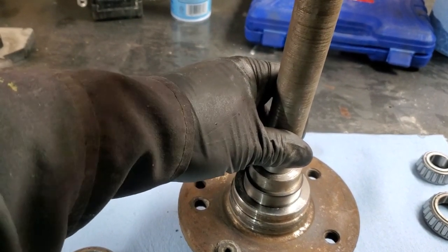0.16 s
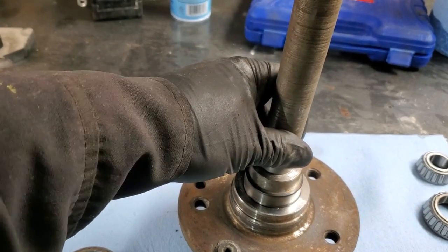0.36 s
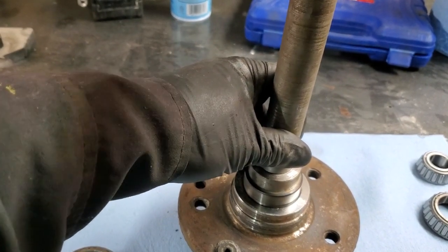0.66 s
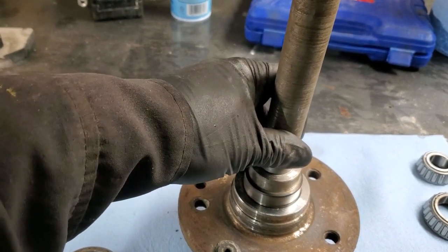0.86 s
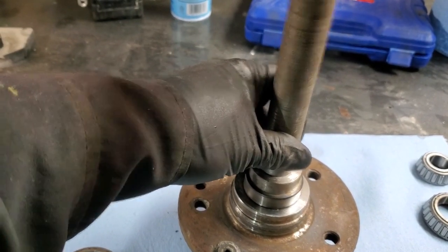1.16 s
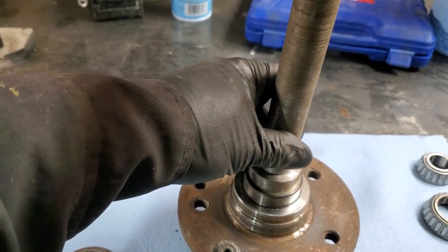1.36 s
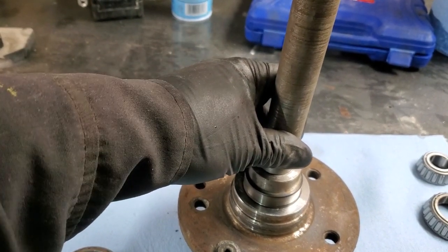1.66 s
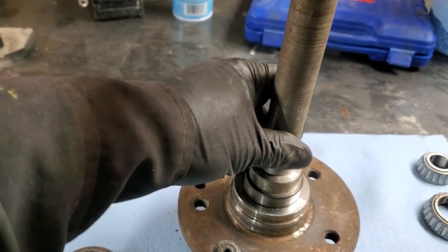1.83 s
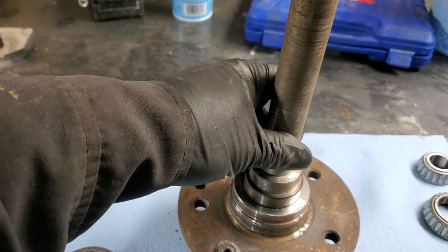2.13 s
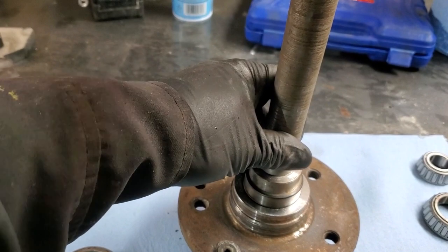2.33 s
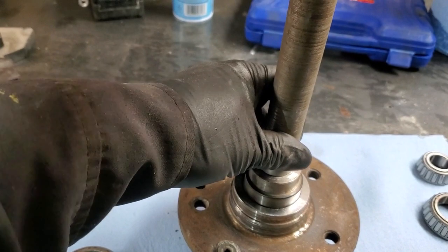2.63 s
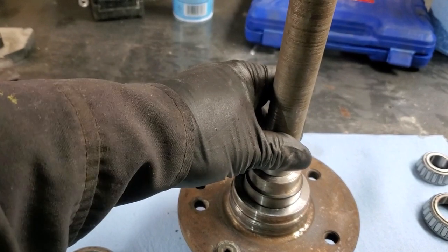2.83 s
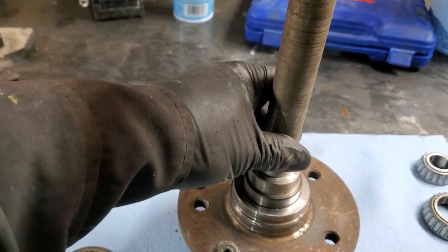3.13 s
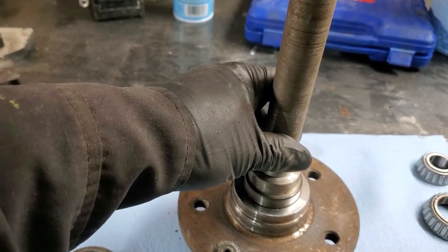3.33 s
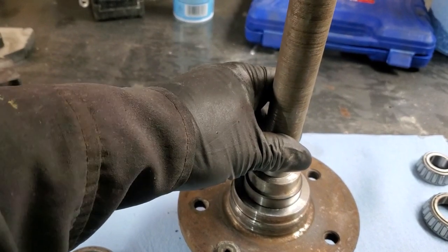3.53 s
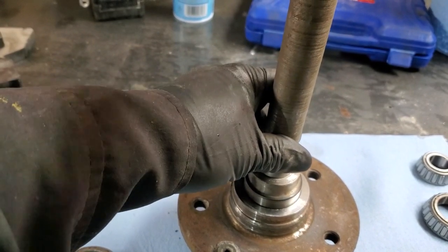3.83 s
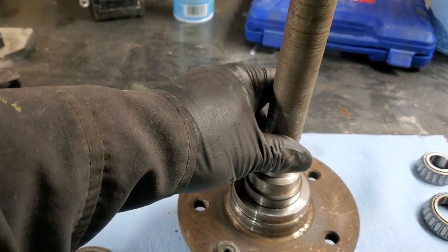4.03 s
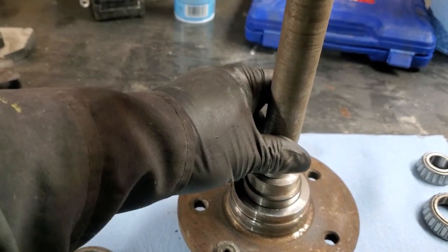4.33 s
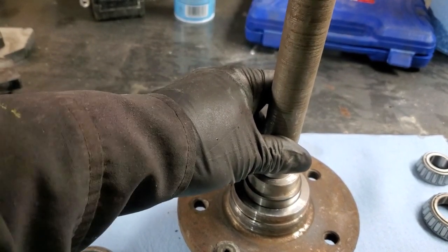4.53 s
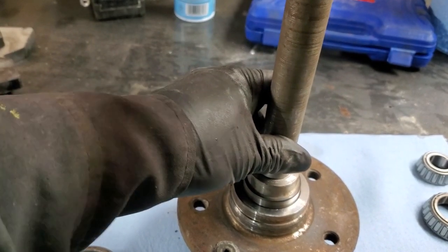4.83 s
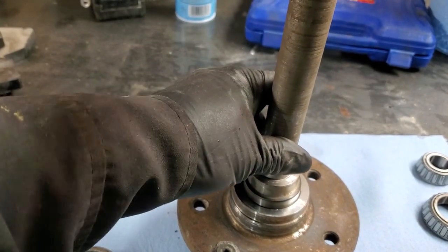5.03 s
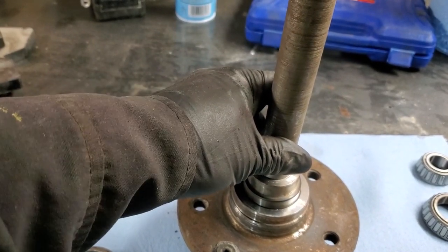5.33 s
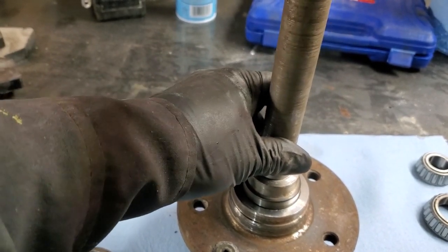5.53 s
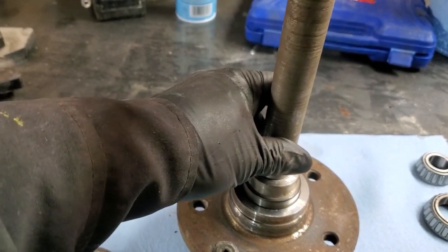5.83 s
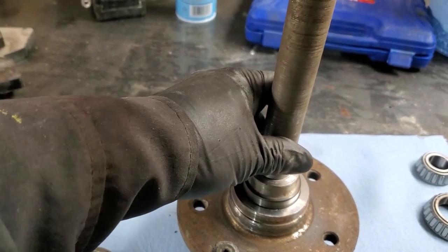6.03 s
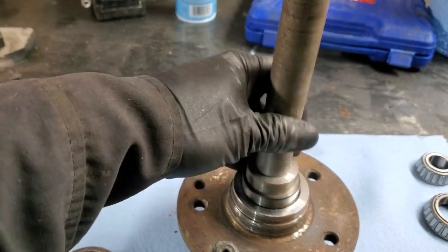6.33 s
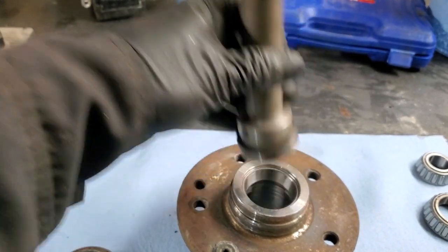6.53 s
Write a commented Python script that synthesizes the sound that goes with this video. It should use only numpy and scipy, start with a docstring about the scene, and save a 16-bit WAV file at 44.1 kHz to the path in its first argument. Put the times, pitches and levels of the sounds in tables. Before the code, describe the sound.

Loud, close hammering on steel over quiet room air and a low hum. Ten regular blows crack, thud through bench and hub, and clang for about half a second in a small room. Midway a loose part rumbles on the bench, chatters and scrapes between blows. The final strike sounds firmer and less boomy; the background drops and the bar brushes out with tiny clinks. Stereo, slightly left-heavy.

```python
"""Over room air and a low hum, a hammer strikes a steel bar ten times, driving a bearing race into a hub.
Each blow is a noise crack with bar modes, a modal thud of bench and hub, and a dense decaying clang.
From midway, a small loose part rolls, knocks and scrapes: shaped noise, damped modes and a fluttering squeak.
After the last blow the background sinks, and the bar is lifted off with faint modal clinks."""
import sys
import numpy as np
from scipy import signal
from scipy.fft import rfft, irfft
from scipy.io import wavfile
from scipy.ndimage import uniform_filter1d

SR = 44100
rng = np.random.default_rng(int(sys.argv[2]) if len(sys.argv) > 2 else 0)


def to_wav(sig):
    """Store sig (one row per channel, or 1-D mono) as 16-bit WAV at the path in sys.argv[1].

    Samples outside -1..1 are clipped; the rate is SR.
    """
    pcm = np.clip(np.atleast_2d(sig), -1, 1) * 32767
    pcm = np.round(pcm).astype(np.int16)
    wavfile.write(sys.argv[1], SR, pcm.T)  # frames by channels


N = 294147
SECOND = np.arange(SR) / SR  # the time axis of one short sound [s]


def amp(db):
    """Level law: decibels to amplitude gain."""
    return 10 ** (np.asarray(db) / 20)


def unit(x):
    """Normalization: scale to rms 1."""
    return x / np.sqrt(np.mean(x ** 2) + 1e-20)


def along(points, hz):
    """Interpolation on a logarithmic frequency axis through (frequency, value) points."""
    f, v = np.transpose(points)
    return np.interp(np.log(hz + 1), np.log(f + 1), v)


def add(track, s, sound):
    """Superposition: mix a sound into the track from time s, cut at the track's end."""
    span = track[:, round(s * SR):][:, :sound.shape[-1]]
    span += sound[..., :span.shape[1]]


def wander(length, size):
    """Smoothed noise: a random curve of rms 1 that changes over about size points."""
    return unit(uniform_filter1d(rng.standard_normal(length), size))


def onset(rise_s):
    """Exponential approach: gain rising towards 1 with the given time constant."""
    return 1 - np.exp(-SECOND / rise_s)


def strokes(rows, attack_s, sag_db_per_s, release_t60):
    """Envelope superposition: each (start, length, level) row rises, sags throughout and dies away."""
    out = np.zeros((1, N))
    for s, length, db in rows:
        release_db = 60 * np.maximum(SECOND - length, 0) / release_t60
        add(out, s, onset(attack_s) * amp(db - sag_db_per_s * SECOND - release_db))
    return out[0]


# Diffuseness of the stereo image: (frequency [Hz], side against mid [dB])
WIDTH = [(60, -11), (300, -14.5), (700, -1), (1500, 0), (15000, 0)]
# Balance of the stereo image: (frequency [Hz], left against right [dB])
LEAN = [(60, 1), (300, 5.1), (1500, 4.5), (5000, 3), (8500, 1), (13000, 5.5)]


def noise(spectrum, size):
    """Spectral shaping: stereo noise of rms 1, near mono in the bass, diffuse above, louder on the left."""
    hz = np.fft.rfftfreq(size, 1 / SR)
    mid, side = rfft(rng.standard_normal((2, size))) * amp(along(spectrum, hz))
    width = amp(along(WIDTH, hz))
    lean = amp(along(LEAN, hz) / 2)
    pair = np.array([(mid + width * side) * lean, (mid - width * side) / lean])
    return unit(irfft(pair / np.hypot(1, width), size))


def paths(modes):
    """Phase difference: each mode's phase in the two channels, closest where the image is narrow."""
    hz = np.transpose(modes)[0]
    apart = np.arctan(amp(along(WIDTH, hz))) * rng.choice([-1, 1], len(hz))
    return rng.uniform(0, 2 * np.pi, len(hz)) + np.outer([1, -1], apart)


def ring(modes, phases, blur=0):
    """Modal decay: one second of damped modes, struck at new strengths; blur is the rms share of flutter."""
    hz, db, t60 = np.transpose(modes)
    size = amp(db + 2 * rng.standard_normal(len(hz)))
    lean = amp(np.outer([1, -1], along(LEAN, hz)) / 2)
    # a loose contact makes the pitch flutter: time itself runs unevenly
    clock = SECOND + blur * np.cumsum(wander(SR, size=60)) / SR
    alive = SECOND < 2 * t60.max()
    turning = np.outer(2j * np.pi * hz, clock[alive])
    damping = np.outer(np.log(1000) / t60, SECOND[alive])
    sound = ((size * lean * np.exp(1j * phases)) @ np.exp(turning - damping)).imag
    return np.pad(sound, ((0, 0), (0, SR - sound.shape[1])))


# Reverberation of the small room: (frequency [Hz], decay time t60 [s])
ROOM = [(60, .66), (300, .53), (1500, 0.53), (5000, 0.5), (8000, 0.43), (15000, 0.33)]


def tail(spectrum, resonances=0):
    """Reverberant decay: one second of diffuse noise, rippled by resonances [dB], fading at the room's t60."""
    diffuse = unit(irfft(rfft(noise(spectrum, SR)) * amp(resonances), SR))
    hz, t, z = signal.stft(diffuse, SR, nperseg=512)
    fade = amp(-60 * t / along(ROOM, hz)[:, None])
    return signal.istft(z * fade, SR, nperseg=512)[1][:, :SR]


def in_room(x, wet_db):
    """Convolution: a sound together with the room's answer."""
    echo = tail([(100, 0), (15000, 0)])
    echo = echo / np.linalg.norm(echo[0])
    return x + amp(wet_db) * signal.fftconvolve(x, echo, axes=1)[:, :N]


# Hum of a distant motor: (frequency [Hz], relative level [dB])
HUM = [(70.0, -90.5), (177.6, -79)]
# Spectrum of the room air: (frequency [Hz], relative density [dB per Hz])
AIR = [(25, -6.5), (180, -1.5), (450, -11.5), (1200, -27), (5000, -28), (15000, -37)]


def workshop(air_db=-84, busy_db=14, settle_db_per_s=35.5, hum_db=82):
    """Stationary noise plus sinusoids: air and hum, raised by busy_db until they sink after the last blow."""
    t = np.arange(N) / SR
    hum = sum(amp(db + hum_db) * np.sqrt(2) * np.sin(2 * np.pi * hz * t) for hz, db in HUM)
    raised_db = np.clip(busy_db - settle_db_per_s * (t - BLOWS[-1][0]), 0, busy_db)
    return amp(air_db + raised_db) * (noise(AIR, N) + hum)


# Spectrum of the steel crack: (frequency [Hz], relative density [dB per Hz])
CRACK = [(60, -11), (180, 8), (700, -12), (1800, -16), (3300, 3.5), (5500, 0.5), (7400, -4.5),
         (11000, -2.5), (15500, -1.5)]
# Modes of the bar, damped by the hand: (frequency [Hz], relative level [dB], decay time t60 [s])
BAR = [(3240, -2.5, 0.043), (6560, -6.5, 0.058), (8356, -2, .04), (11040, -9.5, 0.08)]


def crack(crack_db=8.5, crack_t60=0.021, left_db=0.0, bar_db=0):
    """Impact excitation: steel on steel gives a short noise burst and sets the bar's modes ringing."""
    burst = amp(crack_db - 60 * SECOND / crack_t60) * noise(CRACK, SR) * amp([[left_db], [-left_db]])
    return burst + amp(bar_db) * ring(BAR, paths(BAR), blur=0.0053)


# Spectrum of the clang: (frequency [Hz], relative density [dB per Hz])
CLANG = [(25, -23.5), (60, -7), (110, -11.5), (220, -5), (420, 1.5), (560, -2), (1050, -3.5), (1800, 0),
         (3300, -4), (5000, -10), (6800, -10), (7300, -18.5), (11000, -16.5), (15500, -16.5)]
# Lengthwise ring of the bar in the room: (frequency [Hz], relative density [dB per Hz])
BAR_RING = [(30, -90), (7300, -51), (8050, -9.5), (8330, 1.5), (8650, -13), (9500, -50)]
# Change of the clang by a firmly seated race: (frequency [Hz], change [dB])
SEATED = [(60, -3), (300, -2), (750, -2.5), (1400, -1.5), (2600, 0.5), (6000, 1.5), (13000, 1.5)]


def clang(resonances, seated, ring_db, first_share, build_s=0.028, clang_db=-4.5, sing_db=-3):
    """Reverberant build-up: dense resonances and the bar's ring swell, then decay in the room."""
    # the hammer never lands on quite the same spot, so each blow favours other resonances
    colour = resonances + 1.3 * wander(SR // 2 + 1, size=90)
    stiffening = seated * along(SEATED, np.fft.rfftfreq(SR, 1 / SR))
    # reflections pile up for some tens of milliseconds before the decay takes over
    swell = 1 - (1 - first_share) * np.exp(-(SECOND / build_s) ** 2)
    dense = amp(clang_db) * tail(CLANG, colour + stiffening)
    return swell * (dense + amp(sing_db + ring_db) * tail(BAR_RING))


# Modes of the bench under the hub: (frequency [Hz], relative level [dB], decay time t60 [s])
BENCH = [(65.7, -9.5, 0.64), (124.5, -10.5, 0.42), (174.8, -1.5, 0.49), (202.7, -7.5, 0.68),
         (252.2, -5.5, 0.48), (266.2, -4.5, 0.45), (285.5, -9, 0.34), (315, -8.5, 0.16), (365, 1, 0.45),
         (384, -1.5, 0.41), (391.6, 0, 0.34), (431.4, -2.5, 0.51), (437, -5, 0.32), (473.4, -1.5, 0.45),
         (523, -18, 0.71), (649.4, -2.5, 0.38), (865, -9, 0.45), (891, -11.5, 0.63)]
# Modes of the hub: (frequency [Hz], relative level [dB], decay time t60 [s])
HUB = [(639, -2, 0.55), (789, -9, 0.6), (960, -3.5, 0.57), (1600, -4, 0.5), (1700, -1, 0.56),
       (1826, -1.5, 0.55), (2150, -3.5, 0.19), (2440, 1, 0.45), (3310, -1.5, .45), (6540, -2.5, 0.41),
       (11290, -16, .4), (13507, -11, .45)]


def thud(bench_paths, hub_paths, bench_db=-19, bench_rise_s=0.0073, hub_db=-27, hub_rise_s=0.0079):
    """Modal response: the blow runs down the bar and makes bench and hub ring after a short rise."""
    aim = 0.5 * rng.standard_normal(len(BENCH))  # each blow shifts the bench phases [rad]
    bench = amp(bench_db) * onset(bench_rise_s) * ring(BENCH, bench_paths + aim)
    hub = amp(hub_db) * onset(hub_rise_s) * ring(HUB, hub_paths)
    return bench + hub


# Hammer blows, the last of which drives the race home: (time [s], strength [dB],
# crack against strength [dB], bar ring against strength [dB], share of the clang present at once [0-1])
BLOWS = [(0.073, -5.5, -9.5, -26, 0.39), (0.634, -5.8, -11, -23, 0.3), (1.225, -5.5, -13.5, -21, 0.41),
         (1.83, -4.5, -13, -27, 0.18), (2.444, -4.5, -12, -30, 0.18), (3.05, -3.5, -12.5, -34, 0.16),
         (3.656, -4, -14, -22, .3), (4.274, -4, -13, -30.5, 0.18), (4.875, -4.5, -13, -30, 0.19),
         (5.49, -3.5, -17, -27.5, 0.46)]


def hammer(contact_s=0.0004, seated_loss_db=6):
    """Impulse excitation: each blow drives crack, clang and thud together."""
    out = np.zeros((2, N))
    bench_paths, hub_paths = paths(BENCH), paths(HUB)
    # hub, tools and walls have countless small resonances, the same for every blow
    resonances = 1.1 * wander(SR // 2 + 1, size=16)
    for s, db, hard_db, ring_db, first_share in BLOWS:
        seated = float(s == BLOWS[-1][0])
        hard = amp(hard_db) * crack()
        dense = clang(resonances, seated, ring_db, first_share)
        # once the race has bottomed out, the blow thuds less
        low = amp(-seated_loss_db * seated) * thud(bench_paths, hub_paths)
        add(out, s, amp(db) * onset(contact_s) * (hard + dense + low))
    return out


# Thin high mode of the race: (frequency [Hz], relative level [dB], decay time t60 [s])
RACE = [(12963, 0, .85)]
# Blows that set the race ringing: (time [s], level [dB])
RACE_RINGS = [(3.657, -52), (5.491, -48.5)]


def race():
    """Free vibration: a single lightly damped mode rings on after certain blows."""
    out = np.zeros((2, N))
    for s, db in RACE_RINGS:
        add(out, s, amp(db) * ring(RACE, paths(RACE), blur=0.001))
    return out


# Spurts of rolling over the bench, each losing speed: (start [s], length [s], level [dB])
ROLLS = [(3.935, 0.054, -42.5), (4.08, 0.15, -44), (4.53, 0.28, -40.5), (5.19, 0.11, -46),
         (5.335, 0.1, -49)]
# Spectrum of the rolling: (frequency [Hz], relative density [dB per Hz])
ROLLING = [(59, -62.5), (100, -30), (188, -12), (330, -11.5), (434, -4), (535, -10.5), (1240, -9.5),
           (5150, -36.5), (6480, -43.5), (15000, -48.5)]


def rolling(bumps_db=2.0):
    """Roughness excitation: the loose part rumbles over the uneven bench top."""
    speed = strokes(ROLLS, attack_s=0.005, sag_db_per_s=29, release_t60=0.4)
    return speed * amp(bumps_db * wander(N, size=700)) * noise(ROLLING, N)


# Knocks of the loose part against its neighbours: (time [s], relative level [dB])
RATTLE = [(3.9444, -33.5), (4.0816, -43), (4.119, -40.5), (4.5501, -17.5), (4.627, -25), (4.6645, -20.5),
          (4.817, -35.5)]
# Spectrum of a light steel contact: (frequency [Hz], relative density [dB per Hz])
TICK = [(150, -14), (400, 1), (1300, -10.5), (3000, 1.5), (6000, 0), (8000, -11.5), (13000, -4.5),
        (15500, -14.5)]
# Modes of the loose part: (frequency [Hz], relative level [dB], decay time t60 [s])
PART = [(5800, -6, .08), (10300, -6.5, .12), (12963, -5.5, .2)]


def knocks(tick_db=-12, tick_t60=0.045, ring_db=-25, room_db=-24, chatter_db=5):
    """Repeated impact: the part chatters in ticks of unsteady level and jingles in its modes."""
    out = np.zeros((2, N))
    for s, db in RATTLE:
        chatter = unit(amp(chatter_db * wander(SR, size=90)))
        tick = amp(tick_db - 60 * SECOND / tick_t60) * chatter * noise(TICK, SR)
        jingle = amp(ring_db) * ring(PART, paths(PART), blur=0.008)
        add(out, s, amp(db) * (tick + jingle + amp(room_db) * tail(TICK)))
    return out


# Scrapes of the part along its neighbours: (start [s], length [s], level [dB])
SCRAPES = [(4.425, 0.024, -38), (4.502, 0.022, -41), (4.55, 0.012, -35.5), (4.617, .022, -38),
           (4.664, .026, -41.5), (4.73, .06, -46.5), (4.82, 0.036, -53.5)]
# Spectrum of the scraping: (frequency [Hz], relative density [dB per Hz])
SCRATCHING = [(400, -22), (1500, 2), (3000, 0), (4500, -6.5), (6300, -2), (8000, -8), (10500, 0),
              (12000, -7), (13200, 0.5), (15500, -6.5)]
# Short chirps as the part sticks and slips: (start [s], length [s], level [dB])
SQUEAKS = [(4.62, .03, -36), (4.672, 0.023, -41), (4.741, 0.016, -41)]


def scraping(grit_db=4, squeak_hz=1296, flutter=0.018, room_db=-9):
    """Friction: rubbing steel gives gritty noise, and a squeak of fluttering pitch where it sticks and slips."""
    grit = unit(amp(grit_db * wander(N, size=70)) * noise(SCRATCHING, N))
    scrapes = strokes(SCRAPES, attack_s=0.004, sag_db_per_s=23.5, release_t60=0.07) * grit
    slips = np.cumsum(squeak_hz * (1 + flutter * wander(N, size=60))) / SR  # phase in cycles
    chirps = strokes(SQUEAKS, attack_s=0.005, sag_db_per_s=62, release_t60=0.065)
    lean = amp(along(LEAN, squeak_hz) / 2 * np.array([[1], [-1]]))
    squeaks = chirps * np.sin(2 * np.pi * slips) * lean
    return in_room(scrapes + squeaks, room_db)


# Clinks of the bar leaving the race: (time [s], relative level [dB])
LIFT = [(6.456, -62), (6.484, -58.5), (6.514, -66.5)]
# Modes of a clink: (frequency [Hz], relative level [dB], decay time t60 [s])
CLINK = [(546, -7, 0.13), (1600, -8, 0.09), (2250, -1.5, 0.15), (3030, -6, 0.062), (4960, 1.5, 0.15),
         (6720, 4, 0.048), (12750, 6, 0.12)]


def lift(ring_db=-8, scrape_db=-6, scrape_t60=0.083, room_db=-18):
    """Grazing contact: the bar brushes the race as it is lifted out, in short scrapes and modal clinks."""
    out = np.zeros((2, N))
    for s, db in LIFT:
        scrape = amp(scrape_db - 60 * SECOND / scrape_t60) * noise(TICK, SR)
        clink = amp(ring_db) * ring(CLINK, paths(CLINK), blur=0.036)
        add(out, s, amp(db) * (scrape + clink + amp(room_db) * tail(TICK)))
    return out


def scene():
    """Superposition of everything on and around the bench."""
    return workshop() + hammer() + race() + rolling() + knocks() + scraping() + lift()


def record(dry, top_hz=15800):
    """Saturation and band limiting: peaks are rounded off, then a steep low-pass removes the extreme treble."""
    held = dry / (1 + dry ** 6) ** (1 / 6)
    # order 10, 0.1 dB passband ripple, 90 dB stopband attenuation
    low_pass = signal.ellip(10, 0.1, 90, top_hz, fs=SR, output="sos")
    return signal.sosfilt(low_pass, held)


dry = scene()
out = record(dry)
to_wav(out)
```